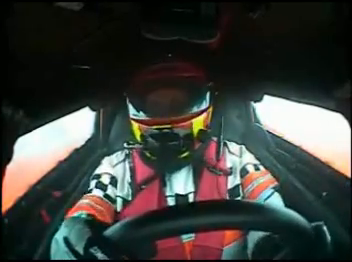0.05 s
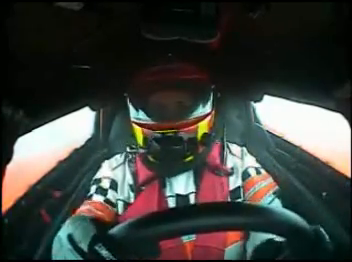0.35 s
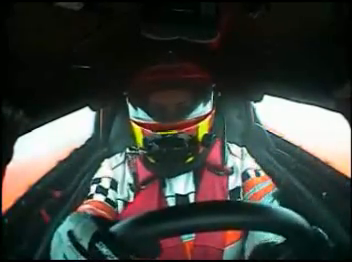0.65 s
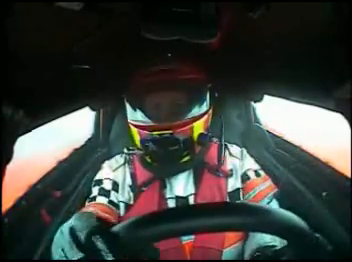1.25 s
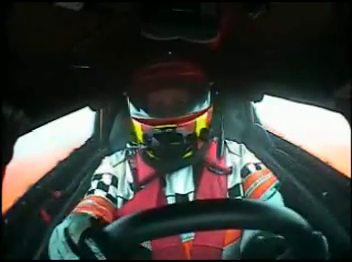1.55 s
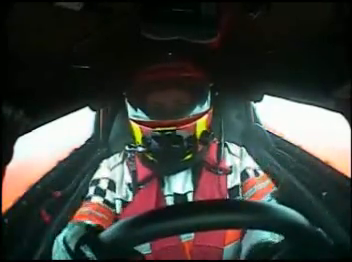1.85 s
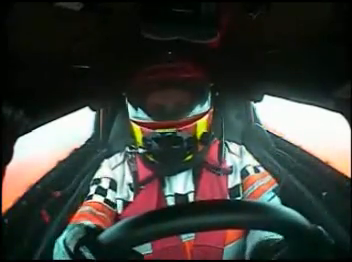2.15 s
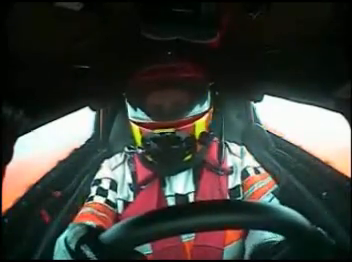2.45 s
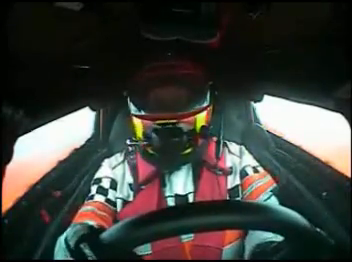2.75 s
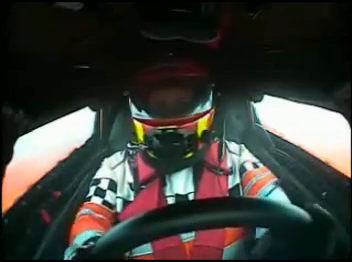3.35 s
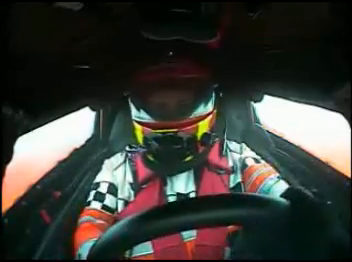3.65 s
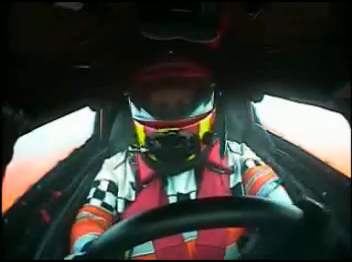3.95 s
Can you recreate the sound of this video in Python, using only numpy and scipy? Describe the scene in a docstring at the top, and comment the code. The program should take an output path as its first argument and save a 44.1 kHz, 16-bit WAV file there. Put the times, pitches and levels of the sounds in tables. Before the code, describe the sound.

A speedboat's engines run hard throughout, heard inside the cockpit as a thin, distorted buzz from an overloaded microphone in the right channel only. They surge and briefly howl while the drive whines and water rushes against the hull.

```python
"""Inside the closed cockpit of a racing boat at full speed, a small microphone close to the din.
Two engines drone slightly apart and race up when the hull skips clear of the water; the drive hums
and whines, water pounds the hull and spray hisses over it. The din overloads the microphone, which
squares it off into a thin, rasping buzz, heard on the right side only."""
import sys
import numpy as np
from scipy import signal
from scipy.fft import rfft, irfft
from scipy.io import wavfile

SR = 44100
rng = np.random.default_rng(int(sys.argv[2]) if len(sys.argv) > 2 else 0)


def wrap_up_sound(samples):
    """Save the sound to the file named by the first command line argument, as 16-bit audio."""
    columns = np.atleast_2d(samples).T
    # keep every value between -1 and 1, then stretch to whole-number steps
    tamed = np.clip(columns, -1, 1)
    steps = np.round(tamed * 32767).astype(np.int16)
    wavfile.write(sys.argv[1], SR, steps)


N = 176400
T = np.arange(N) / SR

# Partials of an engine: multiple of the exhaust note, and level/dB of each
PARTIAL_MULTIPLES = [.5, 1, 1.5, 2, 2.5, 3, 3.5, 4, 5, 6, 7, 8]
PARTIAL_LEVELS = [-25, -1.5, -26, -16, -19.5, -19.5, -27.5, -24, -25, -25.5, -28, -46.5]
FIRING_SCATTER_RAD, FIRING_SCATTER_HZ, FLUTTER_DB = .11, 90, 1.7
HOWL_HZ, HOWL_WIDTH_HZ = 497.7, 75

def engine(note_table, waver, howl_db=0):
    """An unevenly firing exhaust and its fluttering shaft partials, boosted near the howl resonance."""
    note_hz, note_db = curves(note_table)
    phase = running_phase(note_hz, waver) + FIRING_SCATTER_RAD * wander(FIRING_SCATTER_HZ)
    drone = 0
    for multiple, partial_db in zip(PARTIAL_MULTIPLES, PARTIAL_LEVELS):
        nearness = np.exp(-((multiple * note_hz - HOWL_HZ) / HOWL_WIDTH_HZ) ** 2)
        level_db = note_db + partial_db + nearness * howl_db + FLUTTER_DB * wander(44.4)
        drone += amp(level_db) * np.sin(multiple * phase + 2 * np.pi * rng.random())
    return np.sqrt(2) * drone


# Exhaust notes of the leading and the second engine, from the cockpit: t/s, f/Hz, level/dB
LEAD_NOTE = [(0, 243.6, -5.5), (.06, 239.2, -6), (.125, 229.2, -4), (.155, 196.1, -3.5), (.22, 198.6, -1.5),
             (.3, 202, 1), (.345, 221.7, -3.5), (.41, 237.1, 5.5), (.455, 251.4, -2.5), (.5, 241.3, -1.5),
             (.57, 235.4, -2.5), (.615, 229.5, -2.5), (.66, 235.3, 0.5), (.72, 230.1, -2),
             (.745, 200, -6.5), (.795, 180.9, 2), (.87, 186, -4), (.97, 182.1, -0.5), (1.08, 188.5, 0.5),
             (1.17, 197.9, 0.5), (1.4, 200.3, 0.5), (1.58, 207.3, -2), (1.66, 200.2, -4),
             (1.75, 221.9, -4.5), (1.84, 222.9, -10), (1.88, 193, 2.5), (1.95, 184.6, 1.5),
             (2.02, 203.7, -3.5), (2.06, 205, 2), (2.1, 224, 0), (2.17, 233, 3.5), (2.21, 205, -3),
             (2.28, 198.6, -3.5), (2.42, 195.6, -3.5), (2.5, 184.7, -5.5), (2.6, 197.7, -4),
             (2.72, 201.6, -0.5), (2.9, 195.4, 1), (3.02, 202.8, -4), (3.1, 200.9, -2), (3.2, 217.2, -1.5),
             (3.31, 226, 2), (3.38, 205.8, -6), (3.5, 207, -6), (3.62, 220.2, -3), (3.68, 199.8, -6.5),
             (3.75, 202.4, 4), (3.84, 219.3, -6), (3.94, 202.7, 1), (4, 194.5, -8)]
SECOND_NOTE = [(0, 221.9, -6), (.11, 227.3, -7.5), (.17, 180.1, -10), (.3, 199.6, -13.5), (.45, 222.1, -12),
               (.56, 215.1, -7), (.61, 180.2, -5.5), (.68, 215.4, -11), (.77, 215, -16), (.86, 228, 0),
               (.92, 212, -0.5), (1, 194.4, -8), (1.25, 178.6, -5.5), (1.55, 185.2, -6.5),
               (1.8, 189.5, -5.5), (1.93, 200.1, -2), (2.02, 177.4, -8), (2.14, 215.6, -6.5),
               (2.3, 185.7, -7.5), (2.55, 167.3, -5), (2.8, 180.3, -6), (3.05, 180.3, -5.5),
               (3.2, 195.8, -8), (3.38, 186.4, -5), (3.6, 190, -4), (3.8, 190, -3.5), (4, 180.8, -4.5)]

def twin_engines():
    """Two engines drone slightly apart; only the leading one howls."""
    return engine(LEAD_NOTE, waver=.014, howl_db=howl_boost()) + engine(SECOND_NOTE, waver=.01998)


# Howls of the leading engine: middle t/s, length/s, boost/dB
HOWLS = [(.01, 0.12, 22.5), (0.441, 0.12, 11.5), (0.587, 0.27, 4.5), (1.45, .45, 9.5), (2.26, 0.1, 9),
         (3.004, .2, 11.5), (3.473, .2, 15.5)]

def howl_boost():
    """A resonance swells in one soft arch for each howl; gives its boost in dB."""
    return sum(db * np.cos(np.pi * np.clip((T - middle) / length, -.5, .5))
               for middle, length, db in HOWLS)


# Hum of the drive under load: t/s, f/Hz, level/dB
DRIVE_HUM = [(0, 285.7, -18.5), (.7, 280.3, -18.5), (.93, 270, -9.5), (1.07, 259.4, -8), (1.18, 273.7, -6),
             (1.35, 282.1, -4.5), (1.5, 285.5, -12.5), (1.62, 290, -13), (1.76, 272.5, -7.5),
             (2.05, 279.7, -10.5), (2.27, 284.3, -11.5), (2.42, 278.5, -5), (2.52, 269.1, -11.5),
             (2.65, 281.1, -6), (2.85, 276.6, -5.5), (3.1, 284.2, -10.5), (3.3, 291.3, -11),
             (3.5, 297, -16), (4, 290.4, -9.5)]
# Whine of the gears: t/s, level/dB
GEAR_WHINE = [(0, -16.5), (1.5, -14.5), (1.7, -13.5), (1.95, -16.5), (3.05, -21.5), (3.22, -8), (3.52, -12),
              (3.88, -7), (4, -28)]
# Thin ringing of the drive: t/s, level/dB
DRIVE_RING = [(0, -46), (2.401, -21.5), (2.8, -19), (2.98, -23), (3.06, -11), (3.14, -22), (3.45, -18.5),
              (4, -30)]
HUM_FLUTTER_DB, WHINE_HZ, RING_HZ, RING_WIDTH_HZ = 2.5, 438.5, 1316, 31.8

def drive():
    """The loaded drive gives a fluttering hum, a gear whine and a thin, narrow-band ring."""
    hum_hz, hum_db = curves(DRIVE_HUM)
    whine_db, ring_db = curves(GEAR_WHINE)[0], curves(DRIVE_RING)[0]
    hum = amp(hum_db + HUM_FLUTTER_DB * wander(22)) * np.sin(running_phase(hum_hz, waver=.01175))
    whine = amp(whine_db) * np.sin(running_phase(WHINE_HZ, waver=.0058))
    ring = amp(ring_db) * wander(RING_WIDTH_HZ) * np.sin(running_phase(RING_HZ, waver=.0057))
    return np.sqrt(2) * (hum + whine + ring)


# Spectrum of the rush on the hull, from inside: f/Hz, level/dB
RUSH_SPECTRUM = [(25, -19), (70, 2.5), (130, -5), (230, 2.5), (340, -3.5), (500, 0), (650, -1.5),
                 (900, -9.5), (1300, -11.5), (2200, -24), (4000, -28.5), (8000, -40)]
RUSH_DB, RUSH_LUMPS_DB = -4.5, .8

def hull_rush(water_db):
    """Water and wind beat on the hull in a lumpy rush."""
    rush = noise(RUSH_SPECTRUM) * amp(RUSH_LUMPS_DB * wander(31))
    return amp(RUSH_DB + water_db) * unit_rms(rush)


# Spectra of the spray over the hull and of the ticks: f/Hz, level/dB
SPRAY_SPECTRUM = [(500, -30), (2000, -15), (4000, -2.5), (7000, 6.5), (10500, 1.5), (13000, -1)]
TICK_SPECTRUM = [(4000, -55), (8000, -25), (11000, -8), (13000, 0)]
# Thin ticks at the top of the treble: t/s, level/dB
TICKS = [(0.882, -14), (1.128, -12), (1.153, -8), (1.239, -18), (1.809, -13), (2.030, -15), (2.196, -14),
         (2.342, -5)]
SPRAY_DB, SPRAY_FLICKER_DB, TICK_DECAY_S = -30, 2, .0022

def spray(spray_db):
    """Spray flies over the hull in a flickering hiss; a few thin ticks sound on top of it."""
    hiss = amp(SPRAY_DB + spray_db + SPRAY_FLICKER_DB * wander(70)) * noise(SPRAY_SPECTRUM)
    tick_envelope = sum(amp(db) * (T >= t) * np.exp(-abs(T - t) / TICK_DECAY_S) for t, db in TICKS)
    return hiss + tick_envelope * noise(TICK_SPECTRUM)


def amp(db):
    """Decibels to gain."""
    return 10 ** (np.asarray(db) / 20)


def unit_rms(x):
    """Scales to rms 1."""
    return x / np.sqrt(np.mean(x ** 2) + 1e-20)


def curves(rows):
    """Each column of a table, joined by straight lines in time."""
    times, *columns = np.transpose(rows)
    return [np.interp(T, times, column) for column in columns]


def coloured(x, spectrum):
    """Filters by an outline of f/Hz, level/dB."""
    hz, db = np.transpose(spectrum)
    gain_db = np.interp(np.log(np.fft.rfftfreq(N, 1 / SR) + 1), np.log(hz), db)
    return irfft(rfft(x) * amp(gain_db), N)


def noise(spectrum):
    """Noise of rms 1 with the given spectrum."""
    return unit_rms(coloured(rng.standard_normal(N), spectrum))


def wander(rate_hz):
    """Random drift of rms 1, up to about the given rate."""
    low_pass = 1 / (1 + (np.fft.rfftfreq(N, 1 / SR) / rate_hz) ** 4)
    return unit_rms(irfft(rfft(rng.standard_normal(N)) * low_pass, N))


def running_phase(hz, waver):
    """Phase of something that turns unevenly; waver is a share of its speed."""
    uneven_hz = hz * (1 + waver * wander(24.3))
    return 2 * np.pi * (np.cumsum(uneven_hz) / SR + rng.random())


def low_cut(x, hz):
    """Gentle first-order high-pass."""
    return signal.lfilter(*signal.butter(1, hz, "high", fs=SR), x)


# The ride over the waves: t/s, din level/dB, water level/dB within the din, spray level/dB
RIDE = [(0, 12, 1.5, 7), (.07, -2.5, -0.5, -1), (.13, -4, -2, -4), (.19, -4.5, -3.5, -1.5), (.27, 1, -4, 2),
        (.35, 7, 1.5, 5), (.41, 12, -3, -3), (.47, 15, -4, 0), (.55, 9.5, -4, 4.5), (.615, 0, -2.5, 10.5),
        (.66, 14, -5.5, -5), (.715, 5.5, -8, -12), (.75, -6.5, -2, -13), (.82, -14, 3, -16),
        (.87, -9, 0.5, -5), (.91, -12, -0.5, -5), (1.0, -11, -1, -6.5), (1.12, -6.5, 1, 2),
        (1.22, -6.5, 0.5, -2), (1.31, -4.5, 2, 3), (1.39, -5, -4.5, 0), (1.58, -6.5, 3.5, -2),
        (1.67, -1, -0.5, 6.5), (1.75, -1.5, 4, 5), (1.82, -1, -3.5, 3.5), (1.9, -9.5, -2, -4),
        (1.98, -5.5, -0.5, 2), (2.08, 4.5, -0.5, 3), (2.18, 2.5, -1.5, 5), (2.27, -7.5, 0.5, -1),
        (2.33, -7, -0.5, -5), (2.4, -2, -4, 3.5), (2.5, -7.5, -1.5, -3), (2.65, -5, 0.5, 1),
        (2.92, -4, -2, 1), (3.1, -3, 0.5, 3), (3.28, 2.5, -0.5, 5.5), (3.44, -3, 1, 1.5),
        (3.56, -1.5, -2.5, 5), (3.75, -3.5, 1, 2), (3.89, 2, -2.5, 3), (3.97, -4, -2, 0)]

def scene():
    """In the cockpit, engines, drive and water swell together with the waves; spray hisses on top."""
    din_db, water_db, spray_db = curves(RIDE)
    din = twin_engines() + drive() + hull_rush(water_db)
    cockpit = amp(din_db) * din + spray(spray_db)
    return np.array([cockpit, cockpit])


# The small microphone's response and its own hiss: f/Hz, level/dB
MIC_RESPONSE = [(30, 5), (200, 0.5), (600, -0.5), (1500, -2), (3000, -4.5), (5000, -8.5), (8000, -11.5),
                (11000, -10), (13000, -19)]
MIC_HISS = [(50, -2), (1000, 9), (4000, -4), (10000, -16), (13000, -31)]
OVERLOAD_DB, BIAS, KNEE, DROOP_HZ, LOPSIDEDNESS = 13.5, .29, 4, 160, .2
LEAK_DB, LEAK_HZ = 1.5, 4800
OUT_DB, HISS_DB, BAND_LIMIT_HZ = -28, -56.5, 13130

def record(dry):
    """The microphone in the cockpit clips the din to a drooping square wave. Right channel only."""
    pressure = dry.mean(0)
    driven = amp(OVERLOAD_DB) * pressure - BIAS
    clipped = driven / (1 + abs(driven) ** KNEE) ** (1 / KNEE)
    drooped = low_cut(clipped, DROOP_HZ)
    lopsided = drooped + LOPSIDEDNESS * drooped ** 2  # taller on one side
    buzz = low_cut(lopsided - lopsided.mean(), hz=24.7)
    leak = amp(LEAK_DB) * low_cut(low_cut(pressure, LEAK_HZ), LEAK_HZ)  # treble slips past the clipping
    mic = amp(OUT_DB) * coloured(buzz + leak, MIC_RESPONSE) + amp(HISS_DB) * noise(MIC_HISS)
    band_limit = signal.firwin(511, BAND_LIMIT_HZ, window=("kaiser", 9), fs=SR)
    right = signal.oaconvolve(mic, band_limit, "same")
    return np.array([np.zeros(N), right])


dry = scene()
out = record(dry)
wrap_up_sound(out)
```